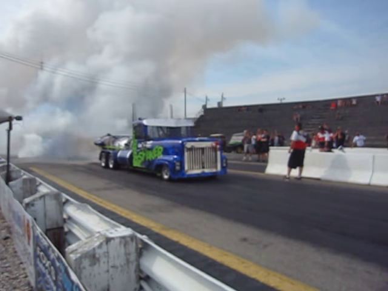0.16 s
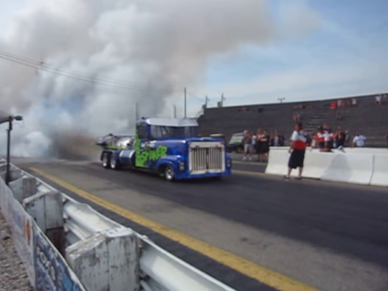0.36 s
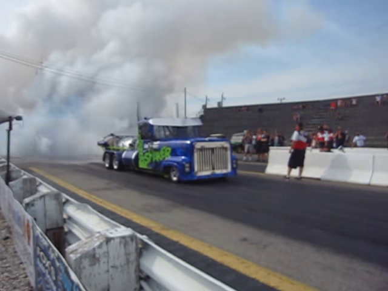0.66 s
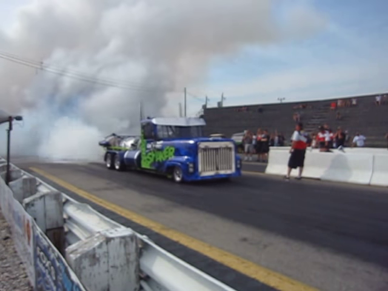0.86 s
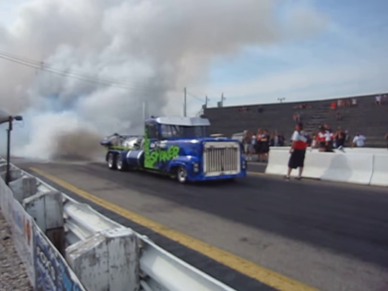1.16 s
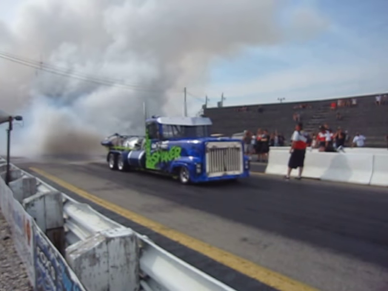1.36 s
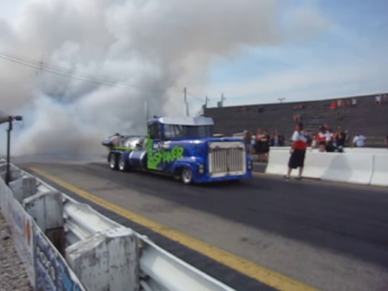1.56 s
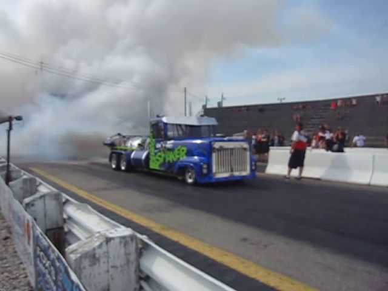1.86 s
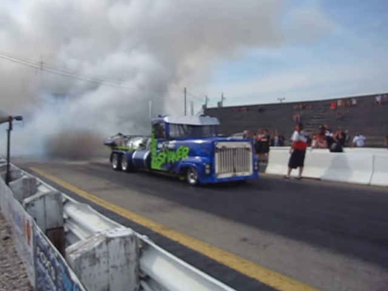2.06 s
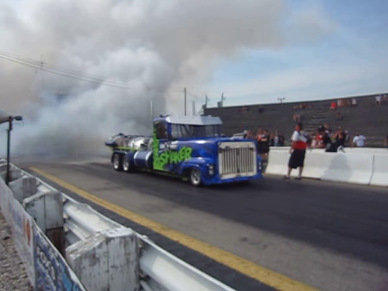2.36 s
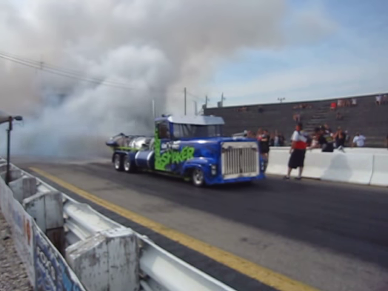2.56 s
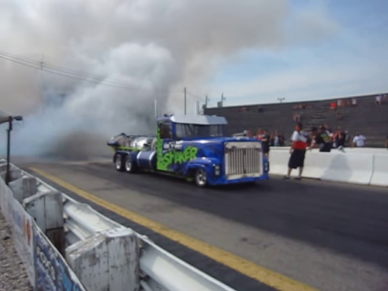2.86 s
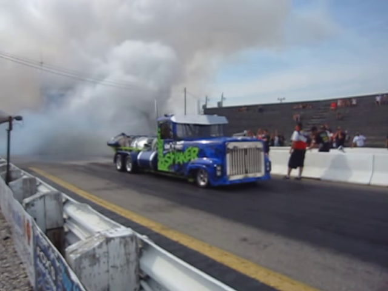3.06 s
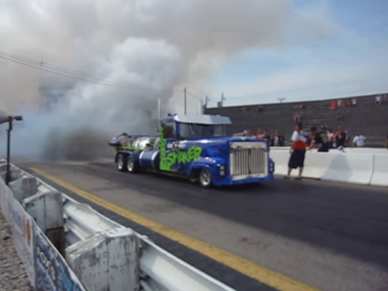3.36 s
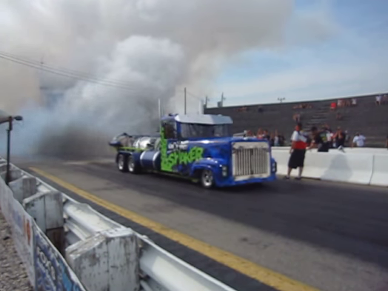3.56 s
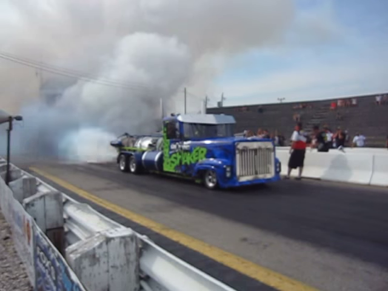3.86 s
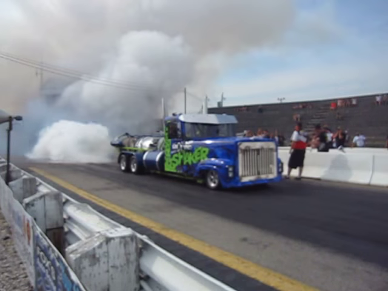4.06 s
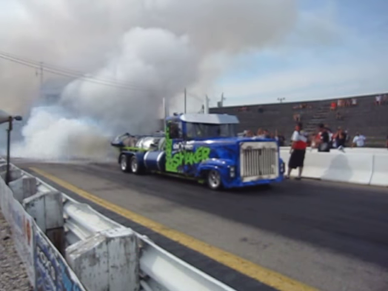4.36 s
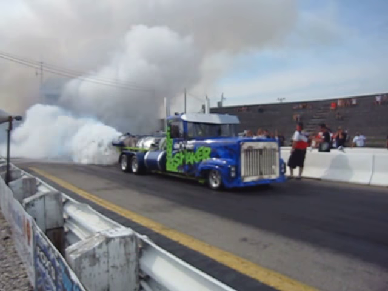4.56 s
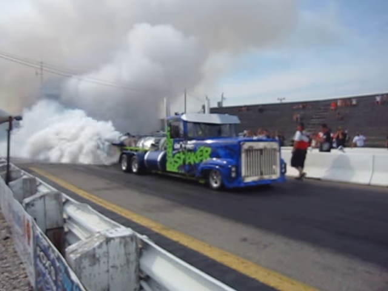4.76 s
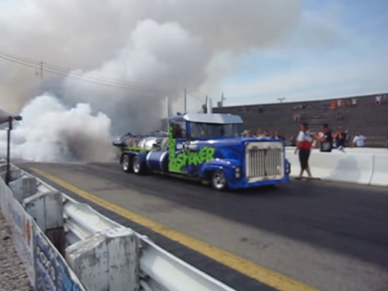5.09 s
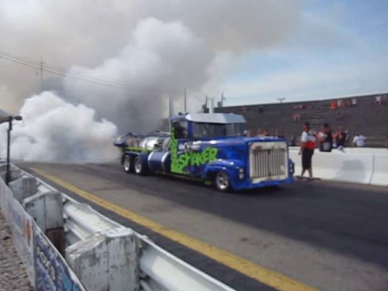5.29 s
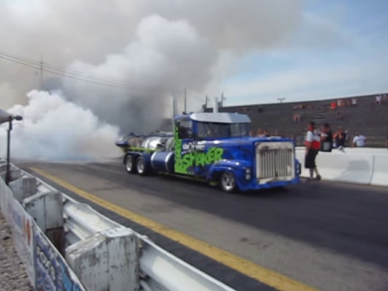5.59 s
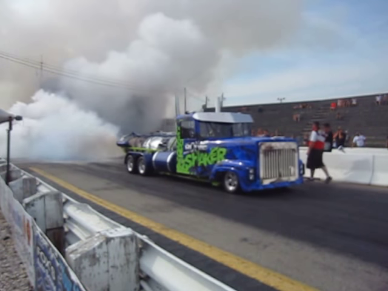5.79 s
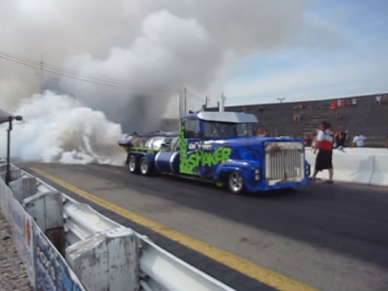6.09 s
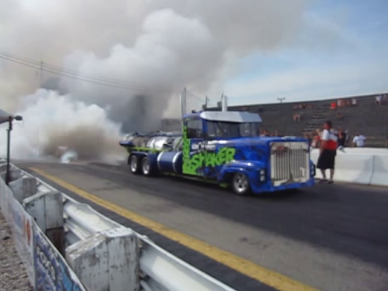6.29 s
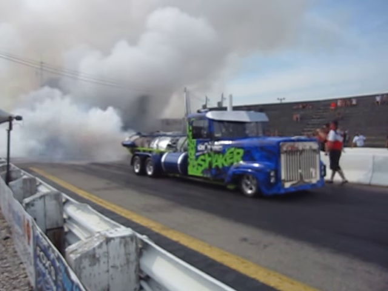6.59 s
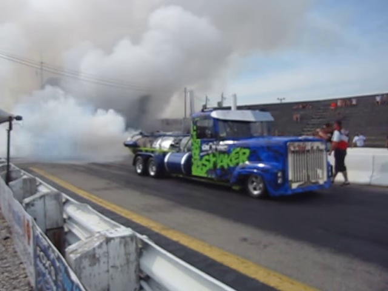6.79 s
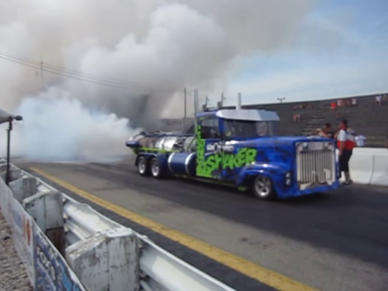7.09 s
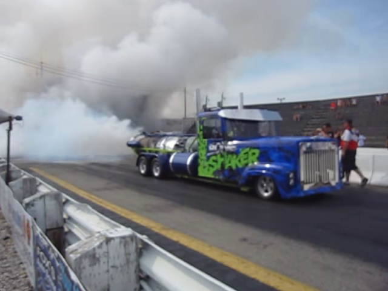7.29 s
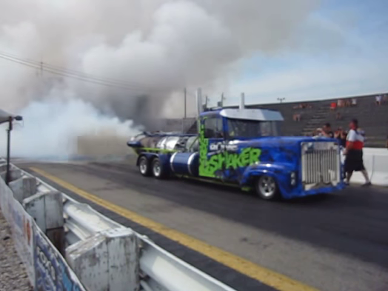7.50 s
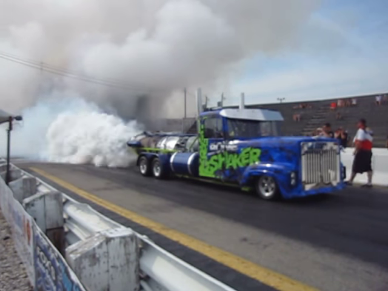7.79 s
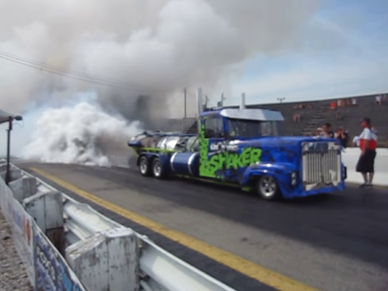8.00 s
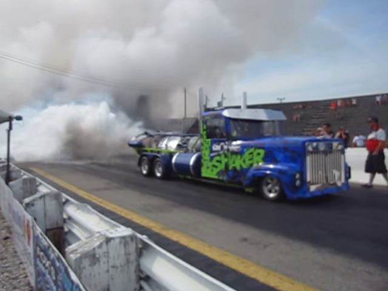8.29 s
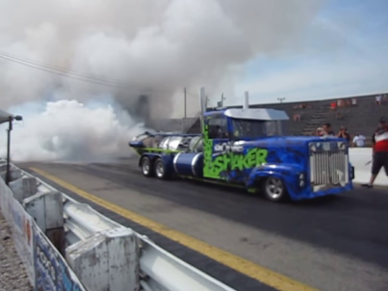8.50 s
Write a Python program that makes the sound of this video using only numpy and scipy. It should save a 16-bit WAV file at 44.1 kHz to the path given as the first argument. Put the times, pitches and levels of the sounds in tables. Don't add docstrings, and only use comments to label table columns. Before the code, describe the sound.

A jet engine on a truck is already running, outdoors, close to a small camera microphone, nearly mono with automatic levelling. Throughout, a piercing whine near 2.2 to 2.4 kHz wavers slowly in pitch, with octave and higher tones flickering and breaking rapidly, over bright intake hiss and rough exhaust roar. At 0 s a cluster of low thumps and rumble opens it, easing by 0.8, then swelling again around 1.1. From 1.2 to 3.5 the whine is prominent; rumbling puffs rise at 2.7 and 3.25. A dull thump comes at 4.1, then burning builds to a deep rumble around 5.2 and drops away at 5.5 as the whine sings out. At 6.1 a hard bang bursts into ragged crackling rumble, fading by 6.7. Whine dominates around 7.2, the octave flares near 7.7, small thumps land at 8.0 and 8.26, and the engine continues to 8.6.

```python
import sys
import numpy as np
from scipy import signal
from scipy.fft import rfft, irfft
from scipy.io import wavfile
from scipy.ndimage import uniform_filter1d

SR = 44100
rng = np.random.default_rng(int(sys.argv[2]) if len(sys.argv) > 2 else 0)


def nominal_scale(level):
    x = np.asarray(level, float) / 20
    return 10 ** x


def master(y):
    cut = np.clip(np.atleast_2d(y).T, -1, 1)
    pcm = np.round(cut * 32767)
    wavfile.write(sys.argv[1], SR, pcm.astype(np.int16))


N = 381452
STEP = 64

# (time [s], blade pitch the turbine torque pulls toward [Hz], below zero = braking)
THROTTLE = [(0.0, 554), (0.202, 5275), (0.441, -1535), (0.67, -220), (0.905, 4480), (1.258, 2437),
            (1.391, 505), (1.756, 4444), (2.129, 528), (2.562, 4493), (2.799, 703), (3.145, 4726),
            (3.537, 350), (3.919, 777), (4.246, 3173), (4.451, 4659), (4.783, 4534), (4.971, 2586),
            (5.112, 183), (5.455, 749), (5.808, 5169), (5.946, 4508), (6.358, 149), (6.768, 802),
            (7.351, 4067), (7.82, 4489), (8.184, 261), (8.545, 1099)]
# (time [s], level [dB])
BLADE_TONE = [(0.0, -28), (0.69, -24), (1.22, -19), (1.73, -17), (1.97, -20), (2.6, -17), (3.25, -19.5),
              (3.74, -27), (4.14, -18.5), (4.78, -35), (5.13, -39.5), (5.56, -18.5), (6.31, -28),
              (6.48, -39), (7.21, -18), (7.83, -23), (8.29, -36.5), (8.65, -30.5)]
# (time [s], level [dB])
SECOND_TONE = [(0.0, -37.5), (0.65, -24), (0.9, -28), (1.7, -28.3), (2.24, -30.5), (2.74, -31.5),
               (3.25, -30), (3.56, -24.5), (4.17, -30), (4.74, -26.5), (5.09, -32), (5.49, -26),
               (6.31, -35.5), (6.78, -26), (7.31, -36), (7.67, -19), (8.05, -38.5), (8.65, -21.5)]
# (time [s], level [dB])
ROW_TONE = [
    (0.0, -42),
    (1.58, -42.5),
    (3.26, -41),
    (5.18, -52),
    (6.72, -52),
    (8.65, -40.5),
]
# (time [s], half width [s], change [dB])
BLADE_FADES = [(0.252, 0.043, -2), (0.373, 0.018, -11), (0.575, 0.035, -6), (1.106, 0.032, -6),
               (1.375, 0.052, -7.5), (2.066, 0.019, -18), (2.331, 0.043, -15), (2.512, 0.034, -6.5),
               (2.71, 0.017, -17.7), (2.862, 0.092, -10), (3.095, 0.077, -5.4), (3.261, 0.03, -11.5),
               (3.775, 0.022, -12), (4.043, 0.056, -23), (4.642, 0.028, 5.5), (4.873, 0.26, 13.5),
               (4.91, 0.028, 7.5), (4.972, 0.023, -21), (5.576, 0.037, -23), (5.764, 0.034, -14),
               (5.876, 0.014, -17), (6.037, 0.04, 9), (6.56, 0.042, 10), (6.744, 0.021, -14.6),
               (6.808, 0.028, 8.5), (6.98, 0.018, 3), (6.99, 0.014, -17.1), (7.175, 0.052, -9.5),
               (7.524, 0.055, -12.5), (8.358, 0.04, 12.5)]
# (time [s], half width [s], change [dB])
SECOND_FADES = [(0.137, 0.04, 9), (0.514, 0.072, -15), (1.021, 0.013, -24), (1.474, 0.029, -15.3),
                (1.634, 0.016, -15.8), (1.935, 0.024, -23), (2.338, 0.023, 8.5), (2.479, 0.025, 8.5),
                (2.641, 0.022, -29), (3.334, 0.022, -16), (3.436, 0.015, -6), (3.702, 0.03, 6.5),
                (3.897, 0.014, 6), (4.318, 0.022, -11.2), (4.387, 0.13, -11), (5.092, 0.064, 6),
                (5.385, 0.016, 5), (5.404, 0.028, -11.0), (5.83, 0.033, -15.2), (6.02, 0.01, 13),
                (6.297, 0.058, 9.5), (6.41, 0.043, 12.5), (6.665, 0.019, 4.5), (6.913, 0.024, 4),
                (6.989, 0.013, -7), (7.554, 0.098, -14), (8.006, 0.032, 16), (8.121, 0.032, 16),
                (8.266, 0.022, -10), (8.607, 0.044, -10)]
# (time [s], half width [s], change [dB])
THIRD_FADES = [(0.301, 0.02, 8), (0.854, 0.1, -5), (1.058, 0.022, 11), (1.137, 0.02, -13.5),
               (1.327, 0.035, -9.6), (1.413, 0.043, 10.0), (1.898, 0.035, -14), (2.305, 0.02, 8),
               (2.494, 0.029, 11.5), (3.011, 0.08, -3), (3.223, 0.022, -14), (3.484, 0.1, -6),
               (3.801, 0.08, 1), (4.015, 0.032, -18.0), (4.131, 0.1, 2), (4.446, 0.06, -10.5),
               (4.606, 0.02, 8), (4.813, 0.035, -16.8), (5.352, 0.11, -10.6), (5.667, 0.02, -22),
               (6.148, 0.035, -8), (6.515, 0.1, -3), (7.363, 0.02, -14), (7.659, 0.13, -11),
               (7.92, 0.035, -5), (8.255, 0.02, -12), (8.471, 0.084, -15.7)]
# (time [s], half width [s],
# change [dB])
ROW_FADES = [(0.027, 0.14, -3), (0.672, 0.035, -20), (2.199, 0.055, -27), (2.324, 0.047, 6),
             (3.051, 0.033, -12.6), (4.329, 0.14, 14), (4.681, 0.098, 13), (5.414, 0.12, 15),
             (5.798, 0.13, 14.5), (5.999, 0.039, 19), (6.506, 0.027, 16), (7.172, 0.17, 14),
             (7.508, 0.18, 10), (8.055, 0.07, -13), (8.592, 0.043, -12),
             (0.473, 0.1, -7.3), (2.498, 0.03, -11.3), (2.69, 0.03, -11.6), (3.476, 0.077, -9.2),
                (4.496, 0.03, -12.8), (6.719, 0.025, 14), (7.3, 0.055, 3), (7.589, 0.027, 7),
                (8.229, 0.03, 6)]
# (time [s], change [dB])
DROPOUTS = [(.1, -3), (.268, -10), (.55, -16), (.845, -12), (3.86, -16), (4.555, -4), (5.066, -10),
            (5.125, -10), (5.95, -8), (6.13, -5), (6.27, -26), (6.45, -14), (6.51, -18), (6.61, -8),
            (6.87, -10), (7.96, -13), (8.245, -10), (8.47, -8), (8.585, -23), (.21, -9), (.605, -19),
            (.72, -5), (.925, -7), (1.075, -15), (1.14, -3), (3.95, -2), (6.31, 5), (6.335, 7)]
# (time [s], change [dB])
BLADE_TWINKLES = [(0.172, 4.5), (0.229, -20), (0.281, -7), (0.543, 6), (0.565, -13.0), (0.595, 5),
                  (0.71, 6), (0.736, -2), (0.778, 6), (0.852, 6), (1.123, -3), (1.343, -7), (1.407, -4),
                  (1.692, 2), (2.289, 3), (3.404, -5.4), (3.472, -6), (3.56, -7), (3.588, -10),
                  (3.931, -10), (4.444, 5), (4.476, 6), (4.52, -6), (4.582, -15), (4.695, -5), (4.775, -12),
                  (5.025, 2), (5.047, -19), (5.104, -11.8), (5.256, -5), (5.316, 6), (5.354, -14),
                  (5.396, -10), (5.573, -7.5), (5.689, 1), (5.931, -7), (5.952, 10.5), (5.974, -11),
                  (6.068, 2), (6.395, -12), (6.671, 7), (6.926, -5), (7.527, -7.0), (7.661, -6.3),
                  (7.693, -5), (7.97, -4), (7.983, 9.5), (8.102, -6.9), (8.289, -8), (8.565, -9),
                  (8.628, 5)]
# (time [s], change [dB])
SECOND_TWINKLES = [(0.202, -3), (0.253, -10), (0.283, -5), (0.307, 6), (0.401, -17), (0.433, 7.8),
                   (0.519, 10.0), (0.619, 1), (0.792, -14), (0.914, -8.7), (1.062, 4), (1.123, -17),
                   (1.253, 3), (1.313, -15.9), (1.383, 0), (2.049, 11), (2.079, 1), (2.123, -8.6),
                   (2.253, -8.3), (2.283, 9), (2.526, 4), (2.556, -12), (2.734, -7.4), (2.881, 5),
                   (2.917, -7.8), (2.965, 9), (3.059, 13), (3.253, -10.1), (3.496, -6.8), (3.568, 3),
                   (3.749, -7.7), (3.835, -7.8), (4.055, 3), (4.48, 10), (4.526, -17), (4.661, -13.7),
                   (4.739, 5), (4.815, -2), (5.021, -11), (5.298, -15.7), (5.492, 7), (5.603, -13),
                   (5.685, -14.5), (5.873, -13.1), (5.988, 5), (6.122, 8), (6.83, -10), (7.058, 6),
                   (7.154, 9), (7.283, -11.2), (7.475, -8.9), (7.603, 8), (7.896, -10.5), (7.956, 7),
                   (8.072, 12), (8.179, -9.8), (8.525, 2)]
BLADE_BREAKS = [0.018, 0.11, 0.191, 0.285, 0.367, 0.527, 0.645, 1.127, 1.424, 2.519, 2.912, 3.997, 4.572,
                4.694, 4.728, 4.778, 4.862, 4.959, 5.881, 6.221, 6.994, 7.841, 7.975, 7.991, 8.185, 8.267,
                8.324, 8.529]
SECOND_BREAKS = [0.09, 0.14, 0.411, 0.618, 0.775, 0.872, 0.888, 0.912, 1.983, 2.362, 2.829, 2.846, 3.107,
                 3.211, 3.412, 3.602, 3.747, 3.926, 3.977, 4.077, 4.129, 4.588, 4.711, 4.761, 4.811, 5.196,
                 5.356, 5.412, 5.923, 6.062, 6.25, 6.487, 6.535, 6.714, 6.864, 7.026, 7.538, 7.629, 8.087,
                 8.33, 8.352, 8.428, 8.524, 8.631]
WEAK_ROWS = [10, 20, 24, 26, 32, 36, 46, 56, 70, 80.85]
WEAK_ROWS_DB = [-50, -55, -45.5, -52, -43.5, -51, -51.5, -44.5, -48, -50.5]
# (multiple of shaft speed, time [s], half width [s], lift [dB])
WEAK_ROW_SWELLS = [(10, 5.0, .3, 6), (10, 3.9, .3, 4), (10, 8.3, .3, 6), (20, 4.25, .25, 6),
                   (20, 5.7, .2, 8), (20, 7.33, .22, 11), (20, 7.85, .08, 9), (36, 1.75, .25, 5),
                   (36, 4.25, .25, 5), (36, 5.7, .2, 4), (36, 7.4, .5, 5), (56, 1.4, .3, 7),
                   (56, 2.4, .3, 9), (56, 8.0, .3, 4), (56, 3.3, .4, 3), (56, .5, .4, -2),
                   (80.85, 4.25, .25, 4), (80.85, 7.17, .2, 4), (80.85, 2.3, .25, 3), (80.85, .3, .3, -2)]
# (multiple of blade pitch, width [Hz], level [dB])
HUMPS = [
    (1.0, 270, -34),
    (2.0, 1160, -37),
]
# (time [s], rumble level [dB])
BURN = [(0, -31.5), (.86, -56.5), (1.12, -31.5), (1.7, -54), (2.02, -39.5), (2.5, -48), (3.1, -48),
        (3.42, -42.5), (4, -59.5), (4.41, -38.5), (5.25, -30.5), (5.51, -61.5), (6.13, -22), (6.68, -56.5),
        (7.36, -47.5), (7.47, -42), (8.3, -35.5), (8.65, -57)]
# (time [s], change of the burning [dB], change of the air flow [dB])
PUFFS = [(.02, -1.5, 0), (.55, 0, 1), (1.38, 0.5, 2.5), (2.67, 11.5, -2), (2.9, 2, 0.5), (3.1, 0.5, 1),
         (3.23, 8, -0.5), (4.498, 3, 0.5), (4.75, -11, 3), (5.22, -4, 0.5), (5.62, -21, 3.5),
         (5.97, -2.5, 2), (6.1, 3.5, -1.5), (6.36, 7.5, 1.5), (7.16, 0, 2), (7.53, 6.5, 1), (7.96, -1.5, 1),
         (8.27, -3, 2), (3.41, 4, 0.5), (4.13, -1, 1.5), (4.62, -3, 0), (5.39, 0, 1.5), (7.62, -3.5, 1),
         (1.85, 5, -3), (4.95, -1.5, -2), (1.22, -1, 0.5), (6.05, -4.5, 0), (.12, -4.5, -1),
         (.3, 2.5, -0.5), (1.7, 1, -1), (2.4, -9, 1.5), (3.75, -0.5, -1), (3.95, -2, -1.5), (6.46, -4, 0),
         (6.75, -1, 1), (6.86, -9, 0), (7.02, -7, 0.5), (6.17, -2, -2.5), (7.3, 1, -1), (8.36, -7, 1),
         (8.52, -1, -0.5), (5.08, 2, 0.5), (.8, -3, -1), (2.25, -7, 1.5), (8.08, 4.5, 2), (.4, 2, 1.5),
         (.9, 4.5, -2), (1.29, -0.5, -2.3), (7.36, 4, -2.5), (8.43, -2, 1), (1.63, -0.5, 1.9)]
# (level at middle burn [dB], share of the burning, share of the air puffs,
# slope with rotor speed [dB per Hz])
LAYERS = [
    (-47.5, 0.68, 0.081, 0),
    (-34.5, 0.19, 2, -0.0238),
    (-30, 0.094, 1.14, -0.0024),
    (-54.5, 0.61, .1, 0),
]
# (pitch [Hz], density [dB per Hz])
HISS = [(300, -43), (2500, -11.5), (4500, 4.5), (6000, -1), (10500, 0), (13000, -6.5), (15000, -19),
        (16500, -26)]
# (pitch [Hz], density [dB per Hz])
ROAR = [(130, -40), (400, -10.5), (550, -3.5), (750, -1), (1300, 1), (2500, 0), (4000, -10.5), (8000, -35)]
# (pitch [Hz], density [dB per Hz])
RUMBLE = [(10, -30), (45, -12), (80, -11), (150, 0.5), (380, 5.5), (700, 0), (1500, -8), (3000, -53)]
# (pitch [Hz], density [dB per Hz])
BOOM = [(20, -30), (45, -12), (75, -6), (110, 0), (150, 3), (220, -2.5), (400, -45)]
# (time [s], peak level [dB], pitch of the push [Hz], dying time [s],
# share of ragged burning)
THUMPS = [(.015, -26, 110, .11, .13), (0.028, -20, 130, 0.089, 0.18), (.039, -17, 172, .25, 0.21),
          (0.059, -24, 400, .12, .3), (0.584, -43, 105, 0.48, .7), (.94, -46, 90, .2, .6),
          (2.73, -42, 130, 0.4, 0.72), (3.262, -23.5, 350, 0.12, .35), (3.26, -48, 90, 0.18, .6),
          (4.09, -33, 420, .1, .3), (5.55, -65, 90, .25, .4), (6.09, -27, 110, .11, .3),
          (6.1059, -10.5, 235, 0.3, 0.26), (6.11, -29, 44, .3, .1), (6.118, -19.5, 1000, 0.13, 0.84),
          (6.135, -26, 700, .07, .4), (6.175, -25, 300, .07, .3), (6.197, -26, 300, .1, .3),
          (6.275, -25, 220, 0.17, 0.34), (6.37, -24, 130, .2, .35), (6.399, -30, 160, .12, .3),
          (7.979, -25, 300, .08, .3), (8.25, -39, 100, .15, .13), (8.261, -24, 480, 0.22, 0.45)]
# (time [s], low edge [Hz], high edge [Hz], level [dB])
SPLITS = [(0.096, 6840.0, 8320.0, -37), (0.819, 11640, 13140.0, -44), (1.094, 8910.0, 11770.0, -36),
          (1.094, 12350.0, 13790.0, -46), (1.457, 8220.0, 9700.0, -36), (1.457, 14550.0, 15080.0, -59),
          (1.771, 5160.0, 6270, -43), (1.869, 5710, 6940.0, -42), (5.793, 5680.0, 6940.0, -38),
          (5.793, 8220.0, 9700.0, -36), (5.793, 13900.0, 15130.0, -57), (6.534, 6280.0, 7630.0, -35),
          (6.534, 11700.0, 13140.0, -40), (7.819, 5630.0, 6900.0, -39), (8.368, 6500, 10430.0, -33),
          (8.368, 12390.0, 13830.0, -43)]

BLADES = 14
FUEL_LAG_S, SPOOL_S = 0.0799, 4.974
START_HZ, CRUISE_HZ, LEAD_S = 2381.3, 2242, 0.0166
DROPOUT_S, BLADE_TWINKLE_S, SECOND_TWINKLE_S = 0.0096, 0.013, 0.0082
BREAK_S, BLADE_BREAK_DB, SECOND_BREAK_DB = 0.006, -9, -16
THIRD_DB = -38.5
PUFF_RISE_S, PUFF_FALL_S = 0.013, 0.04
FUEL_RISE_S, FUEL_FALL_S = 0.035, 0.078
LINGER_S = 0.043
MIDDLE_DB = -45
LIMIT_DB, SQUEEZE, SENSE_S = -19.5, 0.65, 0.054


def evened(x):
    return x / np.sqrt(np.mean(abs(x) ** 2) + 1e-20)


def curve(rows, t):
    rows = np.asarray(rows)
    return np.interp(t, rows[:, 0], rows[:, 1])


def slow_times():
    return np.arange(N)[::STEP] / SR


def every_sample(slow):
    return np.interp(np.arange(N) / SR, slow_times(), slow)


def lagged(x, lag_s, step_s, start):
    keep = np.exp(-step_s / lag_s)
    return signal.lfilter([1 - keep], [1, -keep], x, zi=[keep * start])[0]


def rotor_hz():
    step_s = 1 / 1000
    t = np.arange(0, N / SR + 1, step_s)
    move_s, pull_hz = np.transpose(THROTTLE)
    throttle_hz = pull_hz[np.searchsorted(move_s, t, "right") - 1]
    torque_hz = lagged(throttle_hz, FUEL_LAG_S, step_s, pull_hz[0])
    speed_hz = lagged(torque_hz, SPOOL_S, step_s, START_HZ)
    return np.interp(np.arange(N) / SR + LEAD_S, t, speed_hz)


def heard_db(level, fades):
    t = slow_times()
    s, half_width_s, change_db = np.transpose(fades)[..., None]
    bells_db = change_db * np.exp(-((t - s) / half_width_s) ** 2)
    return every_sample(curve(level, t) + bells_db.sum(0))


def drift(rate_hz, count):
    z = rng.standard_normal((count, N // STEP + 2, 2)) @ [1, 1j]
    keep = np.exp(-2 * np.pi * rate_hz * STEP / SR)
    z = evened(signal.lfilter([1], [1, -2 * keep, keep ** 2], z))
    return uniform_filter1d(np.repeat(z, STEP, -1)[..., :N], size=128)


def main_tones(shaft):
    dropouts = [(s, DROPOUT_S, db) for s, db in DROPOUTS]
    blade_twinkles = [(s, BLADE_TWINKLE_S, db) for s, db in BLADE_TWINKLES]
    blade_breaks = [(s, BREAK_S, BLADE_BREAK_DB) for s in BLADE_BREAKS]
    second_twinkles = [(s, SECOND_TWINKLE_S, db) for s, db in SECOND_TWINKLES]
    second_breaks = [(s, BREAK_S, SECOND_BREAK_DB) for s in SECOND_BREAKS]
    tones = [(BLADES, 0.17, heard_db(BLADE_TONE, BLADE_FADES + dropouts + blade_twinkles + blade_breaks)),
             (2 * BLADES, 0.33, heard_db(SECOND_TONE, SECOND_FADES + second_twinkles + second_breaks)),
             (3 * BLADES, 0.7, heard_db([(0, THIRD_DB), (9, THIRD_DB)], THIRD_FADES)),
             (18, 0.2, heard_db(ROW_TONE, ROW_FADES))]
    out = np.zeros(N)
    for (multiple, scatter, db), wander in zip(tones, drift(24, len(tones))):
        path = (1 + scatter * wander) / np.sqrt(1 + scatter ** 2)
        out += np.sqrt(2) * nominal_scale(db) * (path * np.exp(1j * multiple * shaft)).real
    return out


def weak_rows(shaft, pitch_hz):
    slowing = -np.tanh(uniform_filter1d(np.gradient(pitch_hz), size=6000) * SR / 250)
    sag_db = 2 * slowing + (2250 - pitch_hz) / 22
    out = np.zeros(N)
    for multiple, db, wander in zip(WEAK_ROWS, WEAK_ROWS_DB, drift(20, len(WEAK_ROWS))):
        swells = [row[1:] for row in WEAK_ROW_SWELLS if row[0] == multiple]
        level_db = heard_db([(0, db), (9, db)], swells + [(0, 1, 0)])
        if multiple == WEAK_ROWS[-1]:
            level_db = level_db + sag_db
        out += nominal_scale(level_db) * ((1.12 + 0.6 * wander) * np.exp(1j * multiple * shaft)).real
    return out


def chopped_turbulence(shaft):
    surge = evened(nominal_scale(air_db(order=2)))
    out = np.zeros(N)
    for multiple, width_hz, db in HUMPS:
        noise = rng.standard_normal((N, 2)) @ [1, 1j]
        wake = signal.lfilter([1], [1, -np.exp(-np.pi * width_hz / SR)], noise)
        out += nominal_scale(db) * surge * evened((wake * np.exp(1j * multiple * BLADES * shaft)).real)
    return out


def compressor():
    pitch_hz = rotor_hz()
    shaft = 2 * np.pi * np.cumsum(pitch_hz) / SR / BLADES
    whine = main_tones(shaft) + weak_rows(shaft, pitch_hz) + chopped_turbulence(shaft)
    no_bass = signal.butter(4, 900, "highpass", fs=SR, output="sos")
    return signal.sosfilt(no_bass, whine)


def air_db(order):
    t = slow_times()
    base_db, burn_share, air_share, per_hz = LAYERS[order]
    s, fuel_db, flow_db = np.transpose(PUFFS)[..., None]
    age = np.maximum(t - s, 0)
    fuel_puff = 3 * (1 - np.exp(-age / FUEL_RISE_S)) * np.exp(-age / FUEL_FALL_S)
    air_puff = 2 * (1 - np.exp(-age / PUFF_RISE_S)) * np.exp(-age / PUFF_FALL_S)
    burn_db = curve(BURN, t) - MIDDLE_DB + (fuel_db * fuel_puff).sum(0)
    if order == len(LAYERS) - 1:
        power = nominal_scale(2 * burn_db)
        burn_db = 10 * np.log10(lagged(power, LINGER_S, STEP / SR, power[0]))
    speed_db = per_hz * (rotor_hz()[::STEP] - CRUISE_HZ)
    return every_sample(base_db + burn_share * burn_db + air_share * (flow_db * air_puff).sum(0) + speed_db)


def flow(spectrum, order, lo_hz, hi_hz, patchy_db, flicker_db):
    frames = N // 128 + 5
    real, imaginary, patches = rng.standard_normal((frames, 257, 3)).T
    patches = uniform_filter1d(patches, size=8, axis=0)
    patches = evened(uniform_filter1d(patches, size=16, axis=1))
    gusts = evened(uniform_filter1d(patches[40] + rng.standard_normal(frames), size=6))
    grains = (real + 1j * imaginary) * nominal_scale(patchy_db * patches + flicker_db * gusts)
    noise = signal.istft(grains, nperseg=512, noverlap=384)[1][:N]
    point_hz, point_db = np.transpose(spectrum)
    hz = np.fft.rfftfreq(N, 1 / SR)
    shaped = rfft(noise) * nominal_scale(np.interp(np.log(hz + 1), np.log(point_hz + 1), point_db))
    inside = shaped * ((hz > lo_hz) & (hz < hi_hz))
    return irfft(shaped, N) / np.std(irfft(inside, N)) * nominal_scale(air_db(order))


def tail_pipe():
    out = np.zeros(N + SR)
    t = np.arange(SR // 2) / SR - 0.014
    for s, db, hz, dying_s, ragged in THUMPS:
        push = -np.sin(2 * np.pi * hz * t) * np.exp(-(1.9 * hz * t) ** 2)
        pipe = signal.butter(2, [0.5 * hz, 1.57 * hz], "bandpass", fs=SR, output="sos")
        burning = evened(signal.sosfilt(pipe, rng.standard_normal(len(t))))
        burning *= nominal_scale(-60 * t / dying_s) * np.clip(t / 0.0071, 0, 1)
        out[round((s + t[0]) * SR):][:len(t)] += nominal_scale(db) * (push + ragged * burning)
    return out[:N]


def ground():
    low = signal.butter(1, [30, 120], "bandpass", fs=SR, output="sos")
    return nominal_scale(-74.0) * evened(signal.sosfilt(low, rng.standard_normal(N)))


def splits():
    size = 2048
    out, hz = np.zeros(N), np.fft.rfftfreq(size, 1 / SR)
    window = signal.windows.kaiser_bessel_derived(size, 4 * np.pi)
    for s, lo_hz, hi_hz, db in SPLITS:
        noise = rfft(rng.standard_normal(size))
        band = evened(irfft(noise * (hz > lo_hz) * (hz < hi_hz)))
        out[round(s * SR) - size // 2:][:size] += nominal_scale(db) * band * window
    return np.array([out, -out])


def scene():
    hiss = flow(HISS, order=2, lo_hz=7150, hi_hz=15000, patchy_db=0.63, flicker_db=0.74)
    roar = flow(ROAR, order=1, lo_hz=450, hi_hz=1910, patchy_db=0.82, flicker_db=0.63)
    rumble = flow(RUMBLE, order=0, lo_hz=40, hi_hz=400, patchy_db=0.9, flicker_db=0.65)
    boom = flow(BOOM, order=3, lo_hz=40, hi_hz=200, patchy_db=0.5, flicker_db=0.4)
    return np.tile(compressor() + hiss + roar + rumble + boom + tail_pipe() + ground(), (2, 1))


def low_pass(x):
    return signal.sosfilt(signal.butter(12, 15760, fs=SR, output="sos"), x)


def record(dry):
    mic = signal.sosfilt(signal.butter(2, 30, "highpass", fs=SR, output="sos"), dry)
    span = int(SENSE_S * SR)
    power = uniform_filter1d(uniform_filter1d(mic[0] ** 2, span), span)
    power_db = 10 * np.log10(abs(power) + 1e-9)
    levelled = mic * nominal_scale(SQUEEZE * (LIMIT_DB - power_db))
    return low_pass(levelled + splits())


dry = scene()
out = record(dry)
master(out)
```